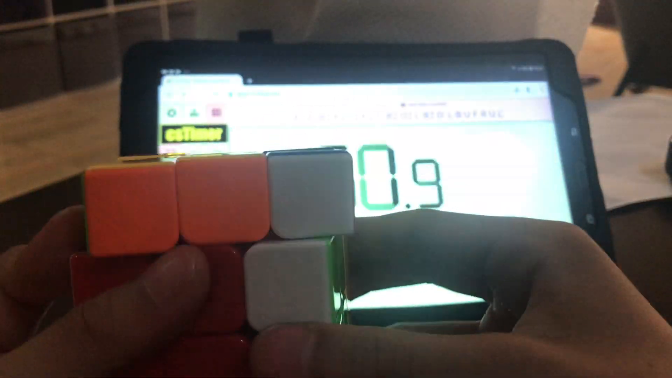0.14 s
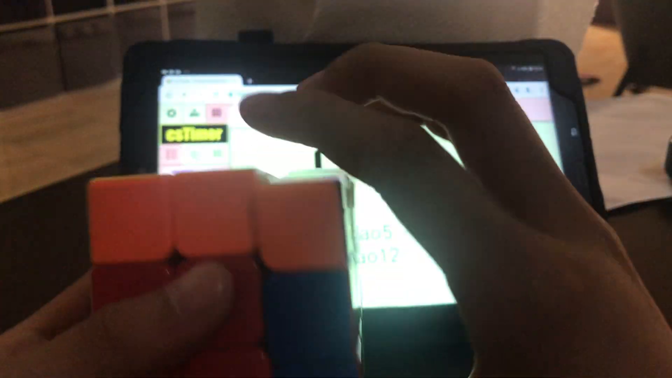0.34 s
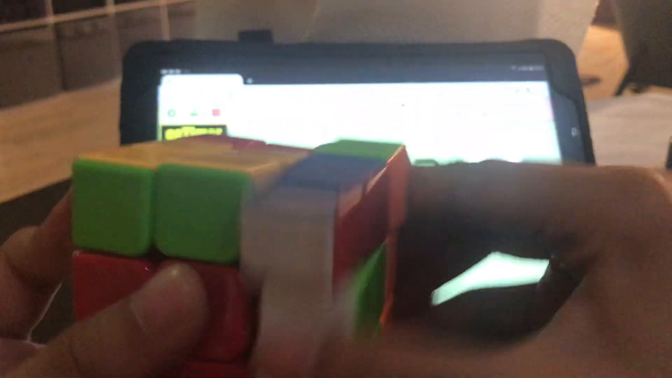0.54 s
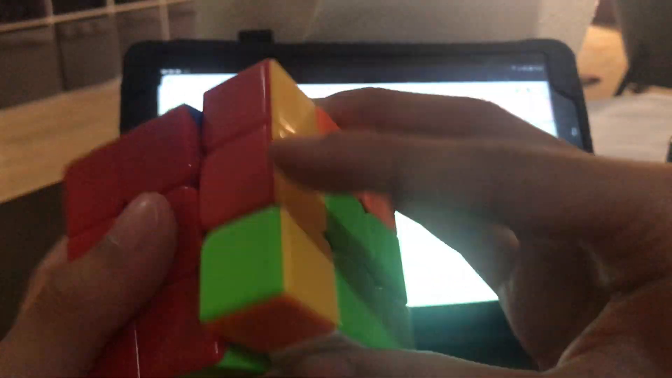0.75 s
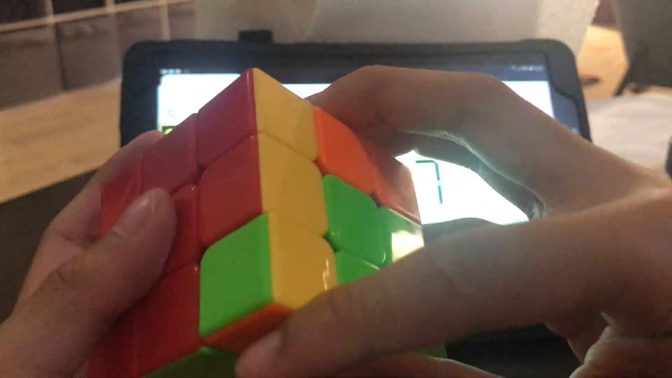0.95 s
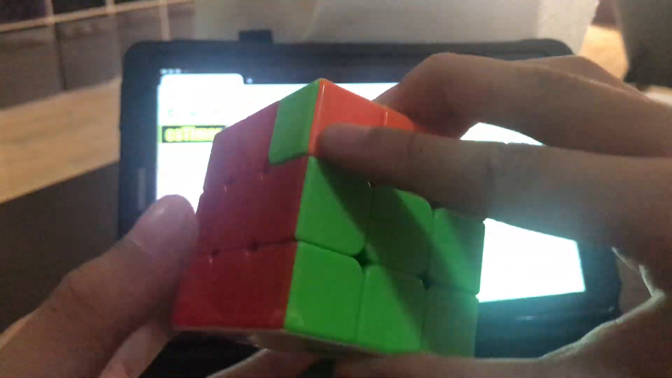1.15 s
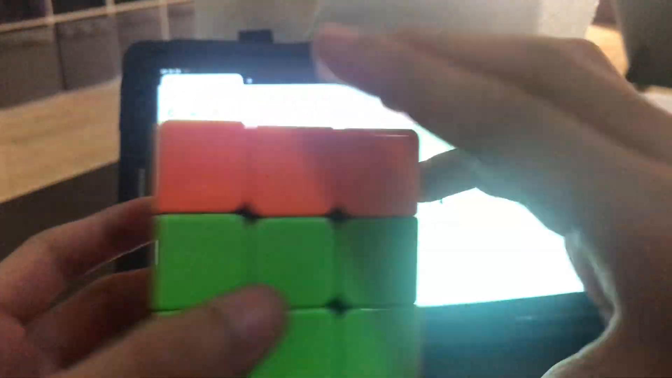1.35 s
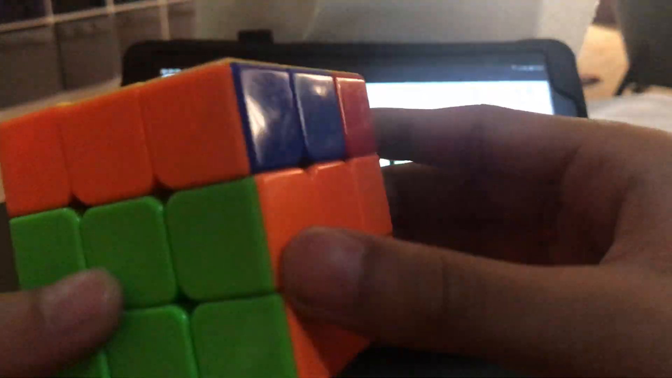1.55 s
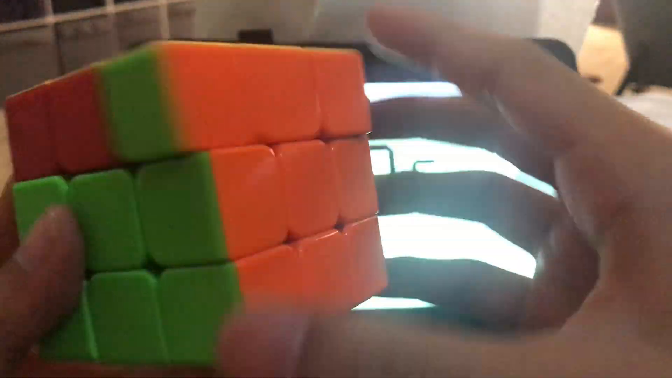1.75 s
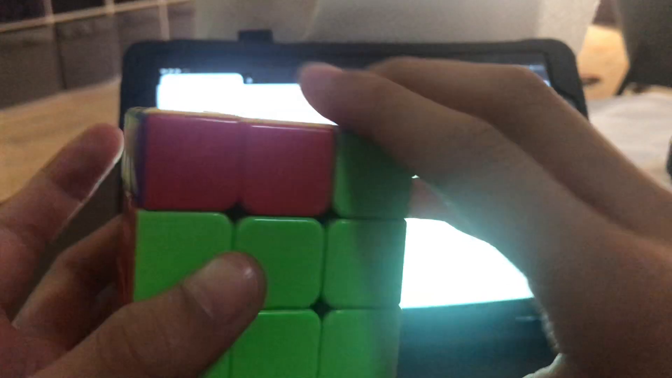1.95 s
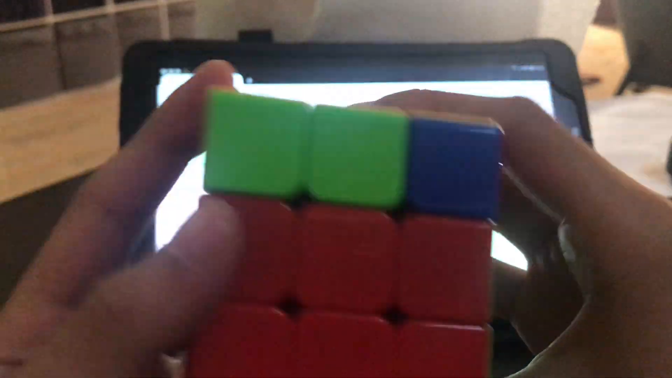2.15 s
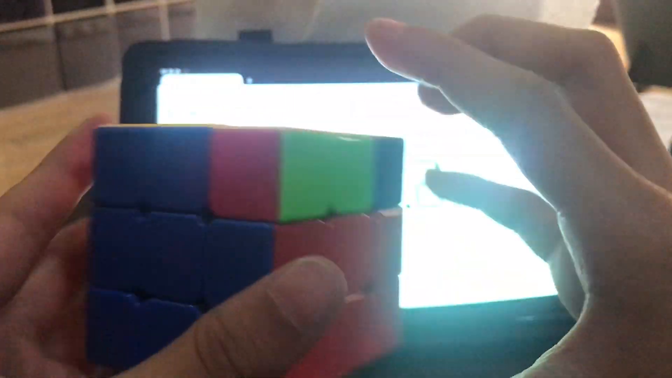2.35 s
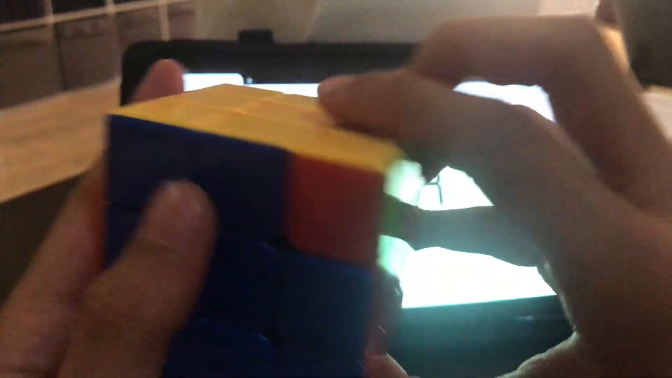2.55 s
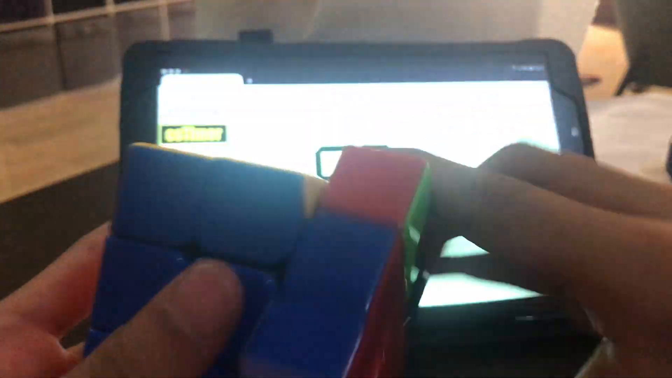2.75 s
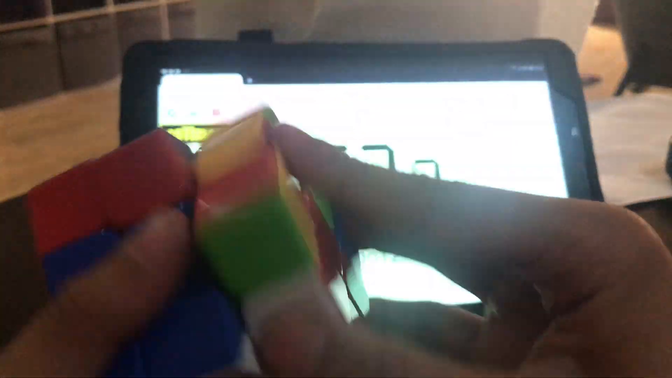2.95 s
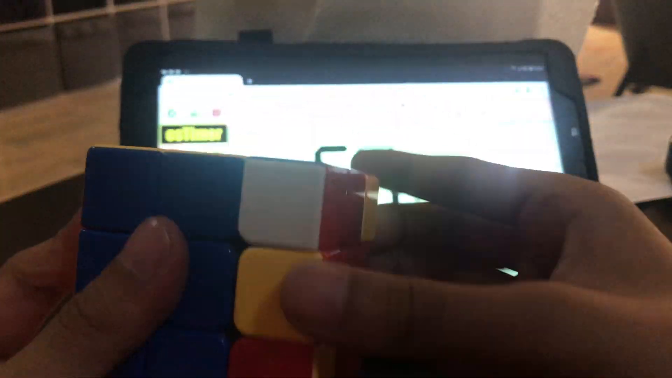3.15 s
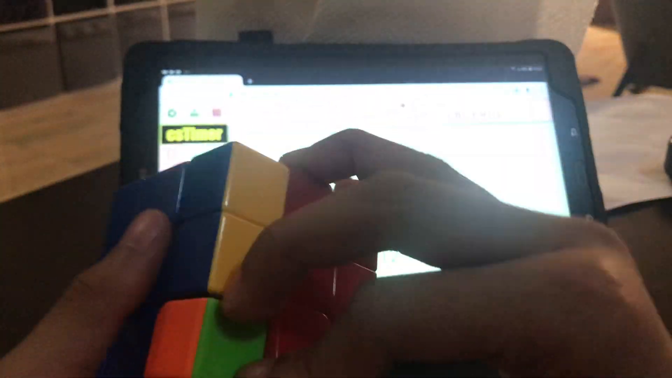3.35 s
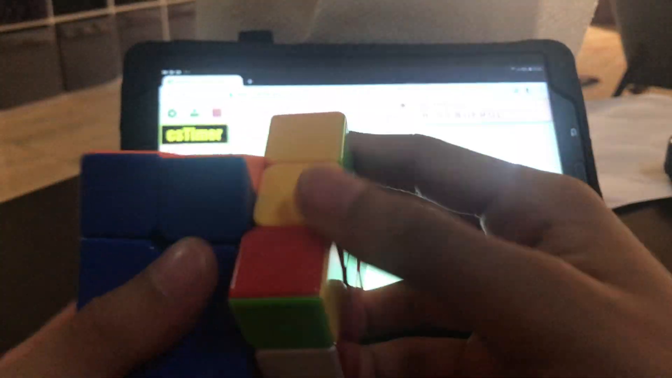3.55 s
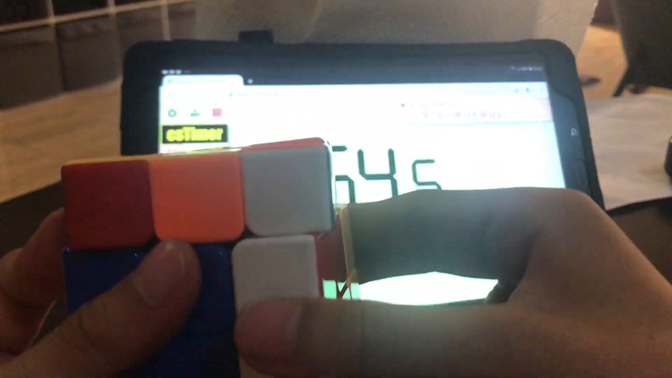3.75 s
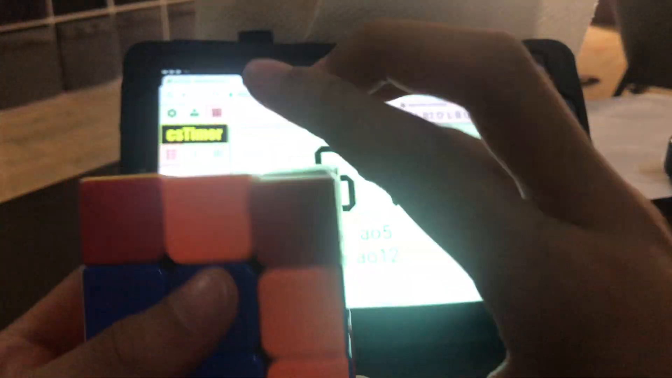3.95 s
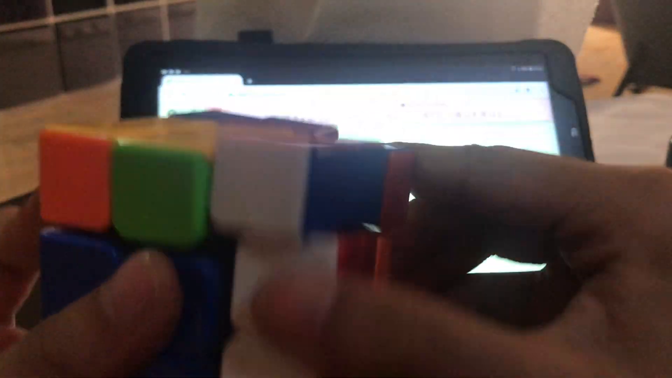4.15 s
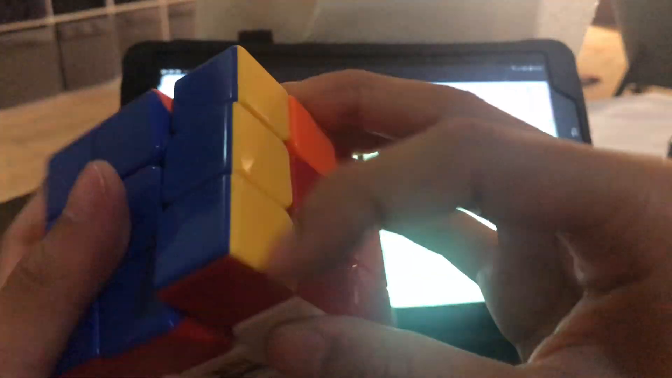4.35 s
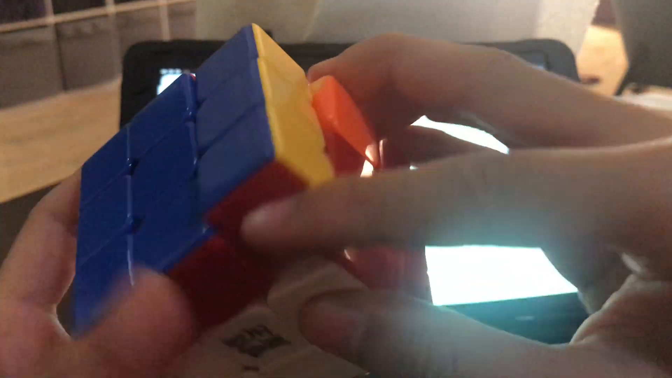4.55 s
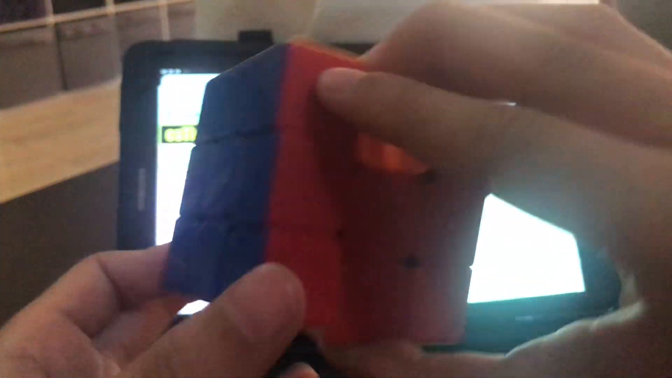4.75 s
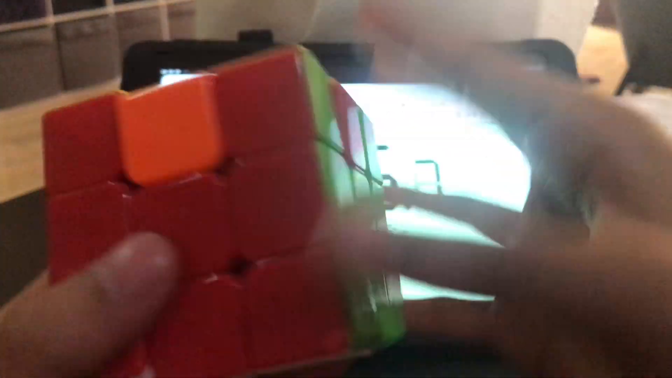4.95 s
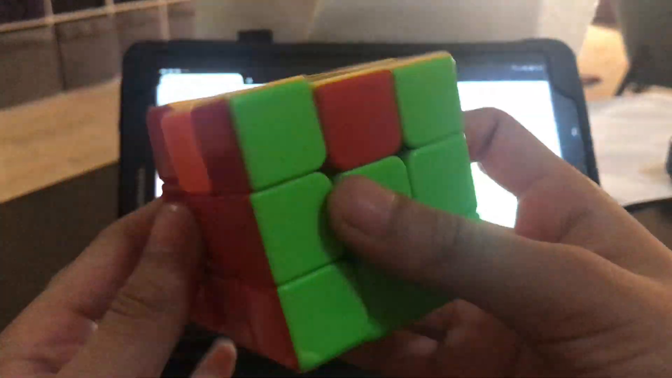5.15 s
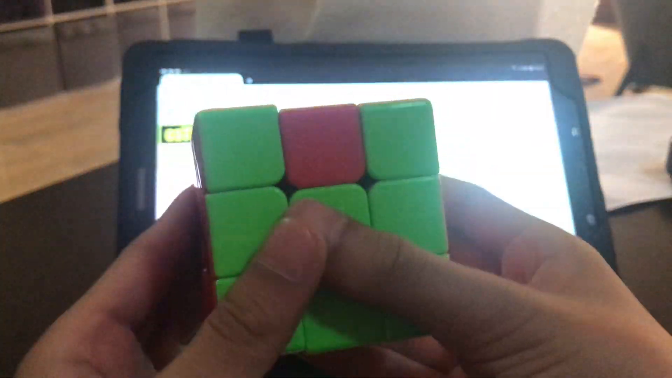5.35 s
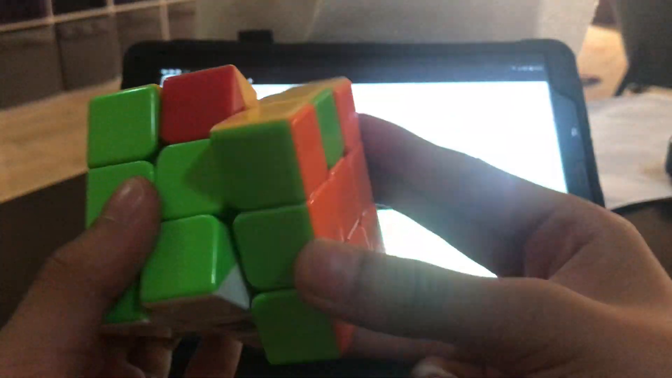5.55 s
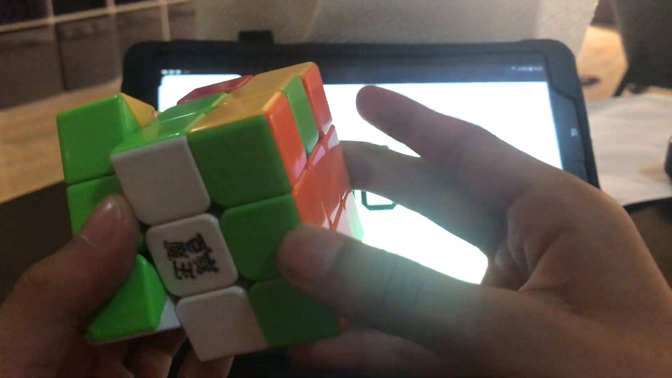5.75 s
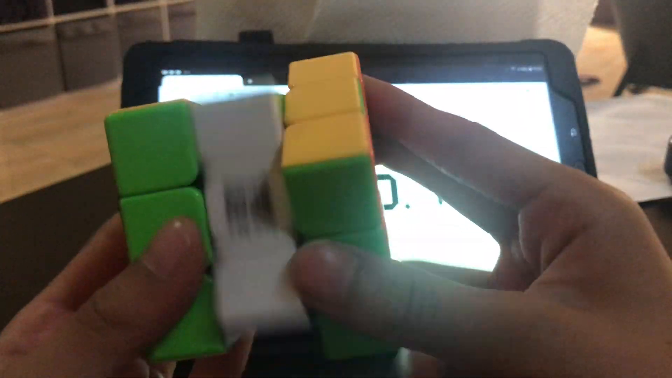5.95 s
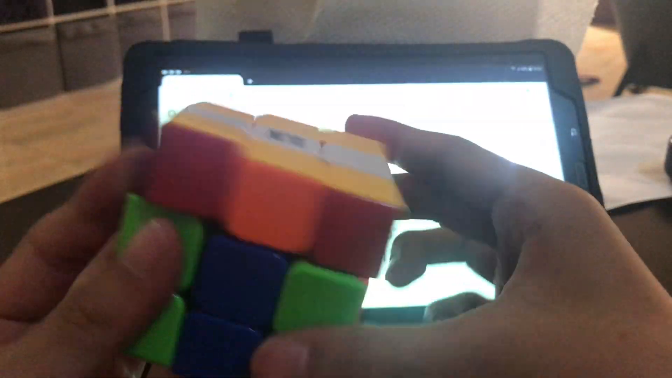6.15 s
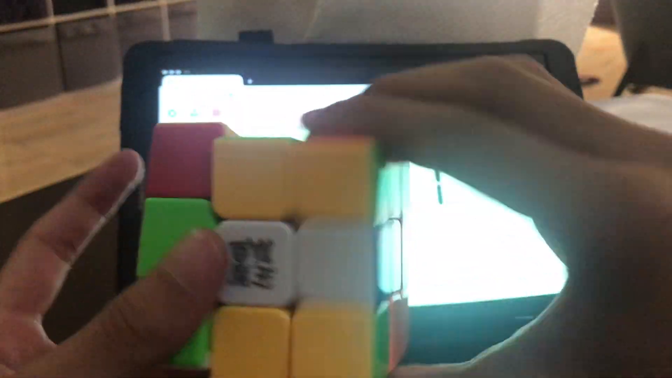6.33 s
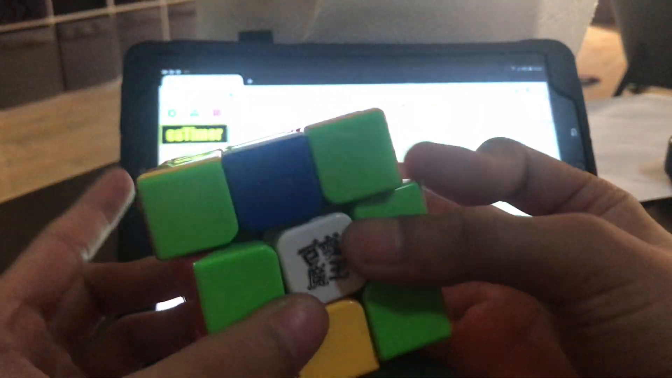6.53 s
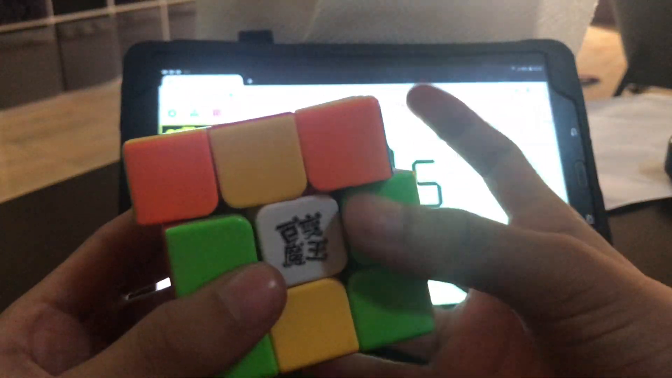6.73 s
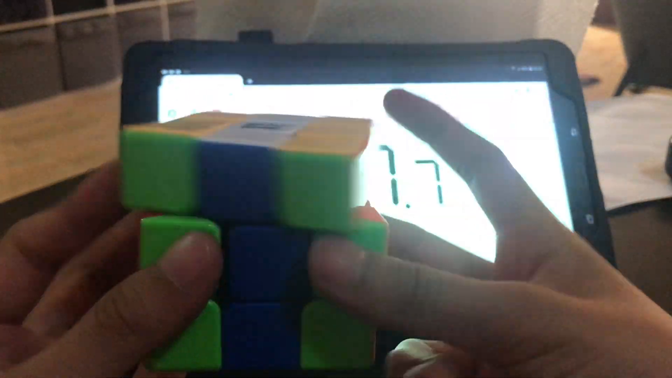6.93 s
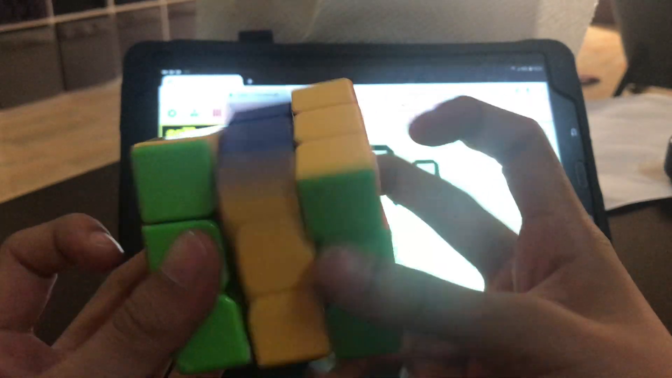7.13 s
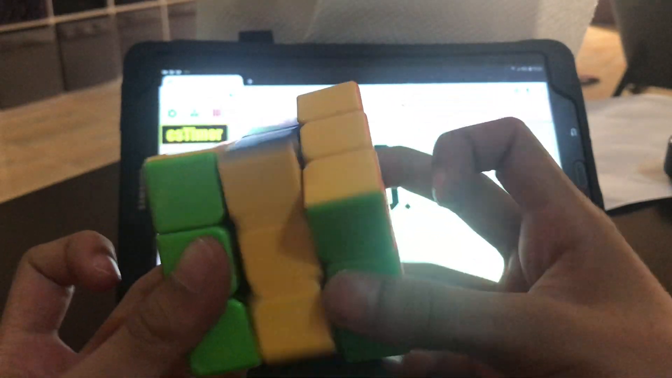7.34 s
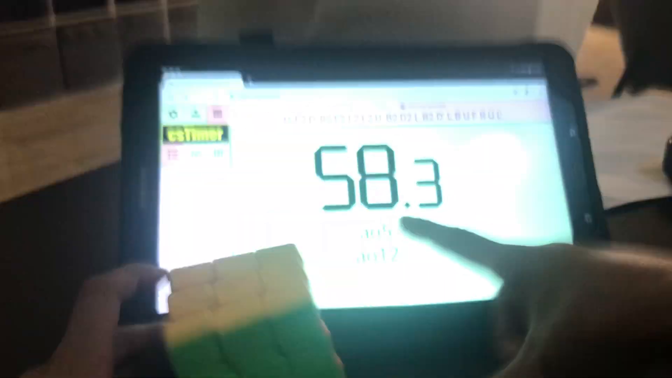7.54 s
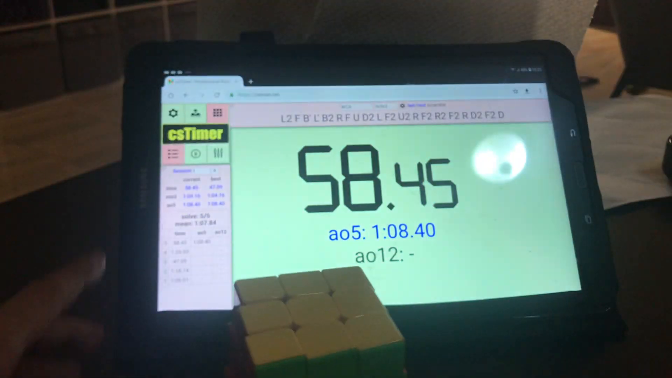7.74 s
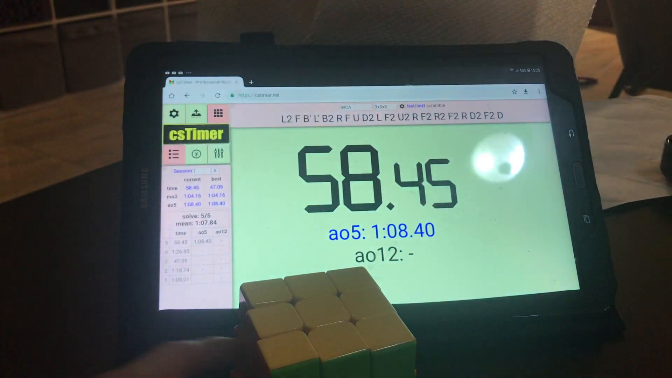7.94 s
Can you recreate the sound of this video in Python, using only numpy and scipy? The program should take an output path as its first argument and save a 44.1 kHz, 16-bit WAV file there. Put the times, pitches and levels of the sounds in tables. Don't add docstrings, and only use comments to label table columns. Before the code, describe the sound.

Fast, dry plastic clicking and gritty scraping from a hand-turned puzzle cube, close up over faint room hum, ending with a clattering thud on wood.

```python
import sys
import numpy as np
from scipy import signal
from scipy.fft import rfft, irfft
from scipy.io import wavfile
from scipy.ndimage import uniform_filter1d

SR = 44100
rng = np.random.default_rng(int(sys.argv[2]) if len(sys.argv) > 2 else 0)


def int16_out(signal):
    q = np.round(np.clip(np.atleast_2d(signal).T, -1, 1) * 32767)
    wavfile.write(sys.argv[1], SR, q.astype(np.int16))


def attenuation_scalar(level_db):
    decades = np.asarray(level_db, float) / 20
    return 10 ** decades


N = 356769

# pitch_hz [Hz], level_db [dB per Hz]
HUM_SPECTRUM = [(30, -0.5), (90, 1.5), (340, -2), (470, -12.5), (700, -14), (1050, -13.5), (1900, -16.5),
                (4500, -35), (16000, -56)]
# start_s [s], level_db [dB]
SLIDING = [(0, -59.5), (.9, -49), (1.07, -78), (1.12, -48), (1.32, -67), (1.72, -81), (1.8, -48.5),
           (1.92, -76), (2.1, -70.5), (2.4, -67), (2.43, -84), (2.5, -68), (2.7, -67.5), (2.84, -51),
           (2.9, -55), (3.18, -49), (3.24, -75), (3.33, -52), (4.47, -61.5), (4.79, -62), (4.9, -65.5),
           (5.37, -68), (5.41, -78), (5.5, -58), (5.7, -58.5), (7.75, -59), (7.9, -72.5), (8.09, -64)]
# pitch_hz [Hz], level_db [dB per Hz]
CUBE_COLOUR = [(180, -56), (300, -29), (614, -28), (713, -39), (900, -5.5), (2100, 2.5), (4230, 3),
               (4990, -0.5), (5610, 7.5), (6740, 5), (8640, 5), (10400, 0), (12500, 8.5), (15800, -2.5)]
# [centre of the ring, Hz]
SNAPS = [(0.0401, -34, 5800), (0.0575, -23, 2300), (0.0602, -34, 2310), (0.081, -42, 1700),
         (0.101, -37, 5500), (0.1292, -40.5, 6900), (0.1732, -40, 7200), (0.1902, -23, 2200),
         (0.1997, -27, 6100), (0.206, -19, 8300), (0.21, -27, 3600), (0.219, -11.5, 3100),
         (0.2426, -23.5, 2380), (0.2567, -25.5, 4100), (0.3017, -24, 4250), (0.306, -44, 3310),
         (0.3123, -24, 1500), (0.3189, -28, 1600), (0.3545, -32, 5500), (0.358, -17.5, 10000),
         (0.3636, -10, 6940), (0.372, -44.5, 5700), (0.381, -29, 3620), (0.445, -41, 1930),
         (0.505, -24.5, 4400), (0.5392, -17.5, 3100), (0.552, -35, 2480), (0.5687, -34, 2600),
         (0.59, -34.5, 7100), (0.6014, -27.5, 3600), (0.6054, -19.5, 3280), (0.6107, -23.5, 1900),
         (0.6185, -36.5, 10400), (0.623, -29, 1910), (0.63, -23, 3100), (0.6395, -24, 1490),
         (0.6459, -16.5, 8900), (0.6518, -22, 1510), (0.6605, -26, 3400), (0.67, -23.5, 6850),
         (0.6756, -29.5, 1490), (0.6856, -30.5, 2300), (0.6976, -24.5, 2610), (0.7045, -26, 5500),
         (0.716, -31, 8600), (0.7377, -32.5, 8700), (0.7512, -36, 6000), (0.7557, -22.5, 4500),
         (0.771, -13, 8400), (0.7738, -8, 5280), (0.7849, -14.5, 5600), (0.7933, -26, 3700),
         (0.8067, -11.5, 5600), (0.8228, -12, 10000), (0.827, -9, 8760), (0.8315, -11.5, 9930),
         (0.997, -53, 2600), (1.015, -39.5, 2320),
         (1.0905, -43, 10100), (1.096, -34, 4340), (1.1233, -28.5, 4650), (1.1305, -29.5, 1600),
           (1.14, -33.5, 3500), (1.1615, -29, 1820), (1.1713, -25, 10600), (1.1753, -22, 4230),
           (1.2277, -36.5, 4000), (1.285, -43.5, 5300), (1.367, -38.5, 1980), (1.4416, -43.5, 1600),
           (1.4564, -53, 3700), (1.484, -39, 1790), (1.5256, -55, 1490), (1.6002, -44.5, 9600),
           (1.6485, -45, 3500), (1.7096, -38.5, 1800), (1.7469, -39.5, 1700), (1.7822, -50, 5200),
           (1.798, -30, 1590), (1.8144, -21, 9900), (1.8207, -28, 2780), (1.882, -41, 6500),
           (1.9545, -49, 5430), (1.967, -44, 2120), (1.9887, -39.5, 1390), (2.123, -46, 2900),
           (2.1337, -40, 2400), (2.1669, -49, 1700), (2.247, -34, 7100), (2.298, -34.5, 4700),
           (2.304, -38, 1700), (2.336, -43, 1510), (2.359, -49, 1700), (2.4696, -43.5, 6640),
           (2.5041, -41, 1600), (2.533, -40, 3100), (2.5453, -47, 10100), (2.6636, -41.5, 1800),
           (2.7203, -45, 1900), (2.7323, -38, 1830), (2.7636, -43, 1800), (2.769, -40, 5500),
           (2.7802, -34, 6000), (2.817, -34, 2440), (2.8344, -41, 1500), (2.845, -43, 10600),
           (2.873, -24.5, 10700), (2.879, -21, 1850), (2.892, -31, 1610), (2.9024, -22, 8000),
           (2.907, -21.5, 2380), (2.9114, -20.5, 1500), (2.9185, -14.5, 4900), (2.925, -14.5, 9100),
           (2.9393, -42, 2300), (2.961, -41, 3900),
         (2.98, -35, 4900), (2.985, -29, 5600), (3.0033, -17.5, 8100), (3.0089, -10, 5760),
           (3.013, -39, 2400), (3.0244, -17, 4500), (3.031, -18, 5000), (3.036, -31, 3300),
           (3.043, -12.5, 2630), (3.0482, -8.5, 3800), (3.063, -22, 6600), (3.0691, -4.5, 8500),
           (3.074, -10.5, 7640), (3.0911, -21, 1750), (3.093, -25, 2690), (3.1054, -20.5, 5100),
           (3.1102, -23, 2800), (3.1506, -26, 3300), (3.155, -27, 4000), (3.1597, -24, 3250),
           (3.1813, -38, 3300), (3.217, -40, 3040), (3.2464, -37.5, 4600), (3.2672, -34, 3670),
           (3.2752, -34.5, 6340), (3.291, -35, 3920), (3.3054, -39, 5300), (3.3144, -20.5, 2960),
           (3.3209, -26, 2090), (3.333, -26.5, 2400), (3.3448, -32, 2580), (3.355, -18, 4070),
           (3.3587, -31, 2800), (3.37, -38, 6500), (3.373, -32, 1600), (3.387, -28, 6900),
           (3.397, -30, 3100), (3.4039, -21, 2840), (3.4165, -22, 9200), (3.4201, -8, 5530),
           (3.4319, -11.5, 5850), (3.4386, -19.5, 7200), (3.4495, -34, 7300), (3.517, -30, 3140),
           (3.5318, -20, 2380), (3.5538, -24, 8700), (3.5653, -18.5, 3300), (3.5779, -24.5, 2220),
           (3.585, -14.5, 7600), (3.6047, -17.5, 2980), (3.618, -32, 1600), (3.6278, -26, 6600),
           (3.6802, -42, 2300), (3.692, -40, 1700), (3.7172, -34, 7700), (3.7437, -34, 2400),
           (3.7613, -47, 2900), (3.7688, -38, 1990),
         (3.785, -24, 4330), (3.793, -26, 2260), (3.7995, -15, 2780), (3.8131, -36, 8600),
           (3.818, -9, 5000), (3.8282, -29, 1500), (3.8416, -26, 3900), (3.8454, -22.5, 7900),
           (3.8561, -23.5, 2830), (3.9076, -22, 6500), (3.9152, -22.5, 3400), (3.924, -19, 9200),
           (3.9368, -36, 9700), (3.95, -15, 2700), (3.955, -11, 8500), (3.9647, -24, 3200),
           (3.975, -27.5, 2300), (3.988, -30, 2980), (4.0661, -39, 3700), (4.0706, -40, 2390),
           (4.093, -27.5, 3200), (4.0987, -21.5, 3530), (4.1074, -34, 5800), (4.113, -24, 8500),
           (4.126, -16.5, 5600), (4.1418, -28, 5600), (4.1493, -30, 3600), (4.155, -23, 8600),
           (4.1665, -17, 5070), (4.189, -20, 4130), (4.195, -27.5, 1500), (4.207, -27, 4200),
           (4.2184, -27, 3700), (4.2261, -12, 5300), (4.243, -22.5, 2600), (4.2544, -26, 3750),
           (4.27, -23, 3600), (4.2854, -29, 4100), (4.2925, -24, 2400), (4.302, -39, 3900),
           (4.314, -29, 3000), (4.3209, -18, 3800), (4.328, -19, 3670), (4.3302, -19, 2520),
           (4.3428, -23, 7660), (4.3564, -28.5, 2300), (4.366, -22.5, 2300), (4.375, -7.5, 5070),
           (4.3837, -27, 6600), (4.397, -34.5, 3700), (4.406, -35, 4330), (4.4133, -24, 5300),
           (4.417, -23, 5300), (4.4205, -14.5, 7050), (4.425, -21, 6100), (4.5288, -49, 8800),
           (4.5362, -35, 5670), (4.546, -53, 1700), (4.561, -38, 2000),
         (4.6086, -46, 1680), (4.6271, -36.5, 4500), (4.6477, -41, 5640), (4.6582, -32.5, 1500),
           (4.667, -33, 3100), (4.681, -40, 1500), (4.7167, -38, 1600), (4.7283, -27, 2680),
           (4.7354, -30, 3470), (4.7383, -25, 2080), (4.744, -32, 2800), (4.7644, -24.5, 3540),
           (4.7707, -16.5, 5000), (4.79, -36, 1500), (4.8867, -53, 2000), (4.9028, -37, 7650),
           (4.9385, -38.5, 3080), (4.973, -43, 1690), (5.0198, -33.5, 2810), (5.044, -40.5, 1600),
           (5.09, -40, 5000), (5.1017, -39.5, 1500), (5.114, -35.5, 10200), (5.1282, -35.5, 3170),
           (5.195, -49, 2900), (5.21, -38, 5250), (5.2357, -45, 2590), (5.2472, -45, 2400),
           (5.2723, -33.5, 5040), (5.295, -37, 3860), (5.3196, -50, 3200), (5.344, -33, 3270),
           (5.439, -44.5, 2000), (5.4474, -57.5, 1770), (5.462, -31.5, 1900), (5.5304, -48.5, 4300),
           (5.547, -38, 7760), (5.6062, -23, 6200), (5.6304, -37, 2800), (5.6524, -42, 4400),
           (5.6694, -34.5, 2200), (5.6915, -43, 4800), (5.7063, -23.5, 1930), (5.7133, -26.5, 5760),
           (5.7172, -28.5, 8700), (5.7236, -22.5, 2600), (5.741, -28, 2780), (5.748, -28, 1900),
           (5.7631, -9.5, 3430), (5.7724, -27.5, 4000), (5.818, -41, 3900), (5.8278, -37.5, 9200),
           (5.853, -47, 3700), (5.871, -42, 8300), (5.8845, -42, 3300), (5.8925, -43, 10100),
           (5.9184, -40, 8300), (5.9441, -56, 1800),
         (5.9646, -32, 3670), (5.9909, -52, 1500), (6.0095, -44, 3500), (6.016, -30, 4400),
           (6.027, -33, 1600), (6.058, -26, 2060), (6.0707, -33, 8000), (6.078, -13, 3030),
           (6.096, -8, 7340), (6.1034, -8, 5730), (6.1662, -33.5, 6300), (6.1812, -35, 3200),
           (6.203, -37, 2700), (6.216, -33, 6600), (6.2236, -43, 7700), (6.23, -24.5, 5300),
           (6.2416, -19.5, 4220), (6.2458, -18.5, 9500), (6.2493, -26, 5200), (6.26, -17, 6740),
           (6.2632, -18.5, 6100), (6.274, -23.5, 4030), (6.3182, -27, 2600), (6.3225, -24.5, 5700),
           (6.326, -23, 3020), (6.341, -14, 9700), (6.3523, -28, 2600), (6.362, -21.5, 6000),
           (6.3663, -11, 7550), (6.372, -21, 3020), (6.376, -23.5, 6900), (6.404, -27.5, 2100),
           (6.4405, -36.5, 3700), (6.4682, -23.5, 2900), (6.472, -25, 2510), (6.4842, -35, 1800),
           (6.4955, -23.5, 2000), (6.501, -24, 4540), (6.5187, -23.5, 3800), (6.532, -23.5, 1880),
           (6.5422, -37, 3500), (6.5514, -34, 5100), (6.556, -33, 3500), (6.569, -23, 1940),
           (6.5727, -19.5, 3370), (6.5912, -21.5, 4500), (6.5964, -24.5, 7640), (6.603, -24.5, 2250),
           (6.6083, -21.5, 9500), (6.6126, -16, 8800), (6.6212, -19.5, 4350), (6.6264, -23.5, 3400),
           (6.634, -24, 3630), (6.6579, -34, 4100), (6.6687, -35, 2110), (6.691, -31, 2100),
           (6.7018, -13, 7600), (6.7057, -15.5, 3620),
         (6.7073, -12.5, 4800), (6.7115, -17, 8900), (6.716, -19, 9200), (6.722, -10, 6100),
           (6.8335, -41, 5700), (6.8628, -35.5, 7100), (6.8792, -48, 5400), (6.901, -46, 2100),
           (6.9068, -39, 2200), (6.9187, -42, 2200), (6.9355, -17, 1630), (6.9437, -17, 7500),
           (6.9518, -23, 5200), (6.9597, -9, 6500), (6.964, -14, 2300), (6.9684, -19, 7000),
           (6.973, -21, 6200), (6.978, -11, 7850), (6.9847, -7.5, 3240), (6.9985, -32, 2900),
           (7.0207, -25, 1800), (7.0261, -20, 3700), (7.0356, -21.5, 5500), (7.0404, -12, 5100),
           (7.0936, -41, 3600), (7.111, -39, 2100), (7.126, -37, 6500), (7.195, -35.5, 1600),
           (7.2134, -28.5, 2030), (7.223, -34, 9400), (7.2313, -18.5, 2800), (7.239, -6.5, 10400),
           (7.2505, -10, 5260), (7.2581, -10.5, 8100), (7.2708, -21.5, 3020), (7.2732, -27, 5960),
           (7.3035, -31.5, 8500), (7.3363, -45, 4000), (7.3711, -42, 5400), (7.385, -33, 6500),
           (7.4092, -53.5, 5700), (7.432, -31, 10000), (7.4396, -20.5, 3100), (7.448, -34, 2200),
           (7.469, -18.5, 2470), (7.4716, -10, 10700), (7.484, -7, 7600), (7.4924, -15.5, 10200),
           (7.4974, -19, 8400), (7.5201, -18, 9100), (7.5509, -32, 5600), (7.5612, -31, 9100),
           (7.612, -30, 1400), (7.619, -36.5, 1500), (7.7255, -23.5, 1690), (7.734, -26.5, 4000),
           (7.7761, -39, 1800), (7.8522, -35, 2800), (8.0812, -44.5, 4240),
         (0.74, -20, 6400), (0.74, -22.5, 2700), (2.004, -57, 5500), (2.0647, -47.5, 7500),
              (8.062, -51.5, 9800), (2.152, -53, 5500), (7.825, -48, 9000), (3.08, -25.5, 5000),
              (2.996, -30, 8500), (4.124, -21, 3530), (4.224, -15, 5400)]
# start_s [s], level_db [dB], contact_ms [ms]
TABLE_BLOWS = [
    (7.6093, -23, 0.33),
    (7.6177, -11, 0.18),
    (7.621, -19, 2.1),
    (7.629, -16.5, 0.86),
    (7.637, -11.5, 1.9),
    (7.678, -23.5, 2.1),
    (7.728, -27, 1.3),
    (7.775, -27, 3.5),
    (7.863, -26.5, 4.3),
    (7.911, -35.5, 2.8),
]
# pitch_hz [Hz], level_db [dB], t60_s [s]
TABLE_MODES = [(62, -6.5, 0.28), (116, -4, 0.35), (156, 4, 0.066), (208, -4, 0.18), (285, 8, 0.1),
               (346, 11, 0.046), (516, 1, 0.085), (760, 12.5, 0.0087), (1340, 10, 0.013)]
# start_s [s], level_db [dB]
RATTLE_LEVEL = [
    (7.6203, -60),
    (7.6209, -11),
    (7.643, -14),
    (7.647, -30),
    (7.68, -60),
]
# pitch_hz [Hz], width_hz [Hz]
PORT_NOTCHES = [(5000, 77), (10400, 220)]


def curve(table):
    return np.interp(np.arange(N) / SR, *np.transpose(table))


def shape_db(table, hz):
    pitch_hz, level_db = np.transpose(table)
    return np.interp(np.log(np.maximum(hz, 1)), np.log(pitch_hz), level_db)


def walk(rate_hz):
    hold = int(SR / rate_hz)
    steps = np.repeat(rng.standard_normal(N // hold + 1), hold)
    return 1.3 * uniform_filter1d(uniform_filter1d(steps, hold), hold)[:N]


def place(start_s, shapes):
    first = (np.asarray(start_s) * SR).astype(int)
    at = first[:, None] + np.arange(shapes.shape[1])
    return np.bincount(at.ravel(), shapes.ravel(), N + shapes.shape[1])[:N]


def rings(hz, gain, start_s, t60_s, size):
    t = np.arange(size, dtype=np.float32) / SR - start_s[..., None].astype(np.float32)
    decay = np.exp(-np.log(1000) * np.abs(t) / t60_s[..., None]) * (t > 0)
    return np.einsum("ek,ekt->et", gain, decay * np.sin(2 * np.pi * hz[..., None] * t))


def pieces(centre_hz, count, chatter_s, t60_s, size):
    u = rng.random((len(centre_hz), 4 * count)).reshape(-1, 4, count)
    hz = 950 + 15800 * ((np.arange(count) + u[:, 0]) / count) ** 1.313
    octaves = np.log2(hz / centre_hz[:, None])
    near_db = 12.5 * np.exp(-(octaves / 0.52) ** 2)
    dull_db = 6 * np.clip(octaves - 1.3, 0, None)
    level_db = shape_db(CUBE_COLOUR, hz) + near_db - dull_db + 10.5 * u[:, 1]
    start_s = chatter_s * np.clip(-np.log(1 - u[:, 2]) - 0.65, 0, None)
    mode_t60_s = t60_s * (0.6 + 0.8 * u[:, 3]) * (hz / 5000) ** -0.3
    return rings(hz, attenuation_scalar(level_db) / np.sqrt(mode_t60_s), start_s, mode_t60_s, size)


def grit(count, start_s, end_s, scatter_db, centre_hz):
    u = rng.random((count, 3))
    colour_hz = centre_hz * 4 ** (u[:, 2] - 0.5)
    grains = pieces(colour_hz, count=5, chatter_s=0.0004, t60_s=0.004, size=224)
    force = attenuation_scalar(-scatter_db * np.log(1 - u[:, 1]))
    x = place(start_s + (end_s - start_s) * u[:, 0], grains * force[:, None])
    return x / np.sqrt(np.sum(x ** 2) / ((end_s - start_s) * SR))


def hum():
    hz = np.arange(N // 2 + 1) * SR / N
    spectrum = rfft(rng.standard_normal(N)) * attenuation_scalar(shape_db(HUM_SPECTRUM, hz))
    bass = 1 / (1 + (hz / 500) ** 4)
    waver = attenuation_scalar(1.5 * walk(3))
    x = irfft(spectrum * bass, N) * waver + irfft(spectrum * (1 - bass), N)
    return x * attenuation_scalar(-53.5) / np.sqrt(np.mean(x ** 2))


def skin():
    hz = np.arange(N // 2 + 1) * SR / N
    x = irfft(rfft(rng.standard_normal(N)) * attenuation_scalar(shape_db(CUBE_COLOUR, hz)), N)
    return x / np.sqrt(np.mean(x ** 2))


def scrape(forces):
    skin_db, grit_db, stray_db, grind_db = -10, -0.5, -12, -10.5
    t = np.arange(-1500, 1501) / SR
    before = 0.19 * np.exp(-np.abs(t) / 0.003)
    after = np.exp(-np.abs(t) / 0.0022)
    load = np.where(t < 0, before, after)
    grind = np.sqrt(np.abs(signal.fftconvolve(forces ** 2, load, "same"))) * attenuation_scalar(grind_db)
    slow = attenuation_scalar(curve(SLIDING) + 1.5 * walk(40) + 2 * walk(11))
    sand = grit(count=9000, start_s=0, end_s=N / SR, scatter_db=1.3, centre_hz=4500.)
    strays = grit(count=450, start_s=0, end_s=N / SR, scatter_db=2.5, centre_hz=5000.)
    rough = sand * np.hypot(attenuation_scalar(grit_db) * slow, grind)
    return rough + slow * (attenuation_scalar(skin_db) * skin() + attenuation_scalar(stray_db) * strays)


def snap(start_s, level_db, centre_hz):
    chatter_s = 0.0008 * attenuation_scalar(0.249 * (level_db + 20))[:, None]
    ring = pieces(centre_hz, count=34, chatter_s=chatter_s, t60_s=0.0077, size=448)
    loudest = np.sqrt(uniform_filter1d(ring ** 2, size=56, axis=1).max(axis=1))
    sound = place(start_s - 0.0005, ring * (attenuation_scalar(level_db - 3.5) / loudest)[:, None])
    force = place(start_s, attenuation_scalar(level_db)[:, None])
    return sound, force


def clicks():
    contacts = SNAPS
    return snap(*np.transpose(contacts))


def knock(forces):
    band = signal.butter(2, (260, 720), "band", fs=SR, output="sos")
    return signal.sosfilt(band, forces) * attenuation_scalar(4.0)


def room(x):
    t60_s, dull_hz, level_db = 0.55, 5500, -26.5
    t = np.arange(SR // 2) / SR
    noise = rng.standard_normal(len(t))
    low = signal.lfilter(*signal.butter(1, dull_hz, fs=SR), noise)
    fade = np.exp(-np.log(1000) * t / t60_s)
    tail = low * fade + attenuation_scalar(-33.5) * (noise - low) * fade ** 2
    tail *= np.clip(t / 0.00056 - 0.5, 0, 1)
    return signal.fftconvolve(x, tail / np.sqrt(np.sum(tail ** 2)))[:N] * attenuation_scalar(level_db)


def table():
    hz, level_db, t60_s = np.transpose(TABLE_MODES)
    signs = (-1) ** np.arange(len(hz))
    top = rings(hz[None], (signs * attenuation_scalar(level_db))[None], 0 * hz[None], t60_s[None], size=16384)[0]
    band = signal.butter(1, (200, 3800), "band", fs=SR)
    rumble = signal.lfilter(*band, rng.standard_normal(len(top)))
    rumble_t60_s = 0.87
    top += attenuation_scalar(-1.5) * rumble * np.exp(-np.log(1000) * np.arange(len(top)) / SR / rumble_t60_s)
    push = np.zeros(N)
    for start_s, blow_db, contact_ms in TABLE_BLOWS:
        contact = np.hanning(int(contact_ms * SR / 1000) + 3)
        push[int(start_s * SR):][:len(contact)] += attenuation_scalar(blow_db) * contact / contact.sum()
    return signal.fftconvolve(push, top)[:N] * attenuation_scalar(-16.5)


def rattle():
    shaken = grit(count=600, start_s=7.62, end_s=7.7, scatter_db=1.5, centre_hz=5000.)
    return shaken * attenuation_scalar(curve(RATTLE_LEVEL))


def scene():
    snaps, forces = clicks()
    shaken = rattle()
    radiation = signal.butter(4, 1080, "high", fs=SR, output="sos")
    cube = signal.sosfilt(radiation, snaps + scrape(forces) + shaken)
    near = cube + knock(forces) + table()
    echoes = room(near + attenuation_scalar(2.5) * shaken)
    return (near + echoes + hum())[None]


def band_limit(x):
    return signal.sosfilt(signal.butter(12, 16960, fs=SR, output="sos"), x)


def record(dry):
    x = signal.sosfilt(signal.butter(5, 44, "high", fs=SR, output="sos"), dry)
    for hz, width_hz in PORT_NOTCHES:
        notched = signal.lfilter(*signal.iirnotch(hz, hz / width_hz, fs=SR), x)
        x = 0.51 * x + 0.59 * notched
    x = 0.9 * np.tanh(x / 0.9)
    x = signal.sosfilt(signal.ellip(10, 0.3, 45, 16000, fs=SR, output="sos"), x)
    return band_limit(x)


dry = scene()
out = record(dry)
int16_out(out)
```